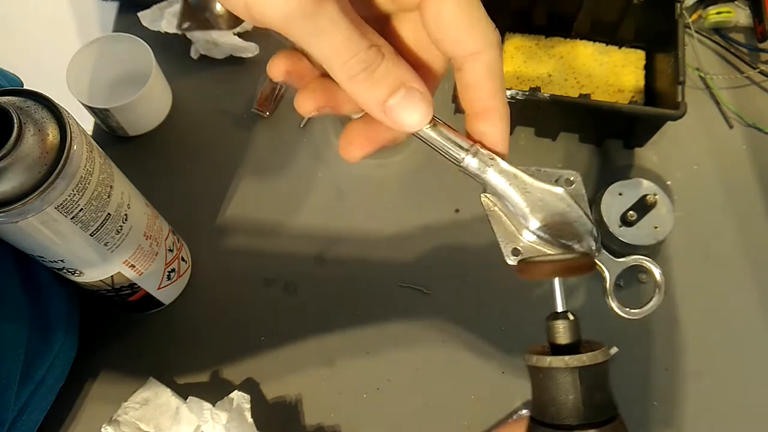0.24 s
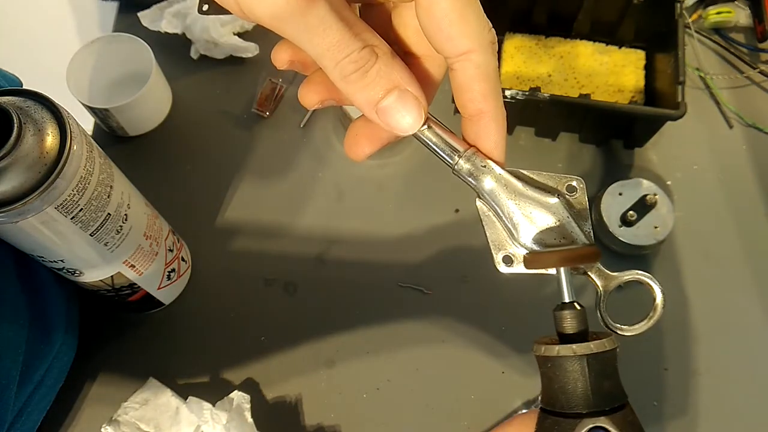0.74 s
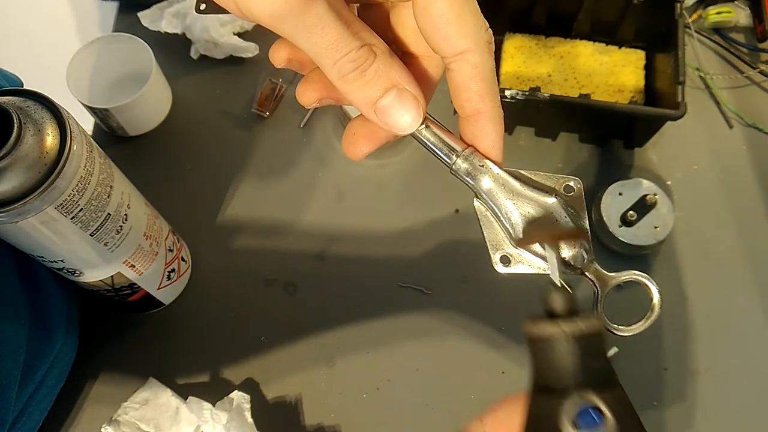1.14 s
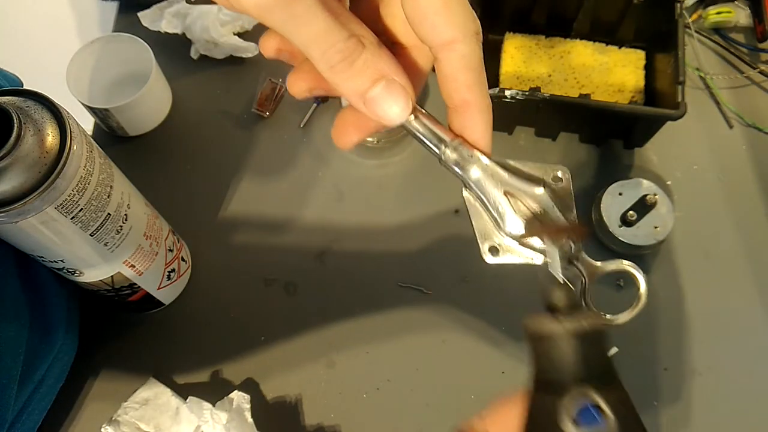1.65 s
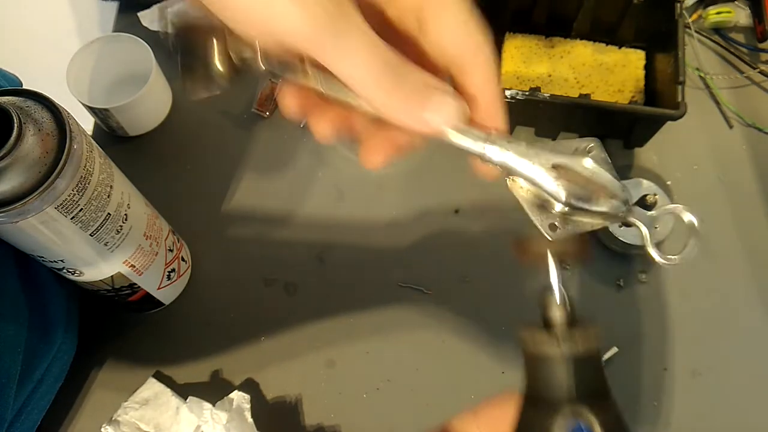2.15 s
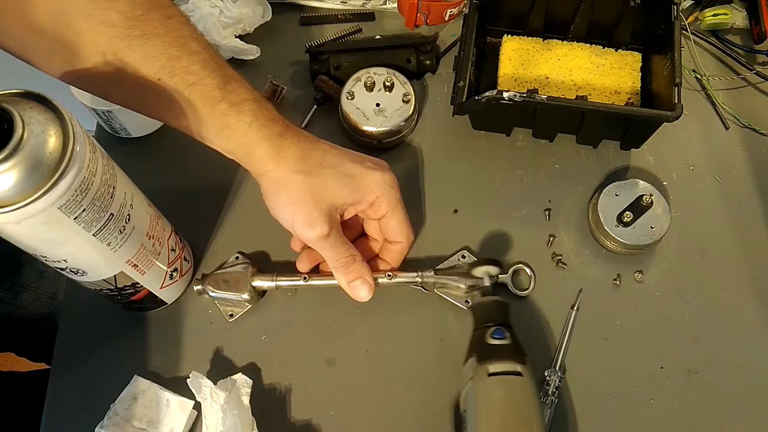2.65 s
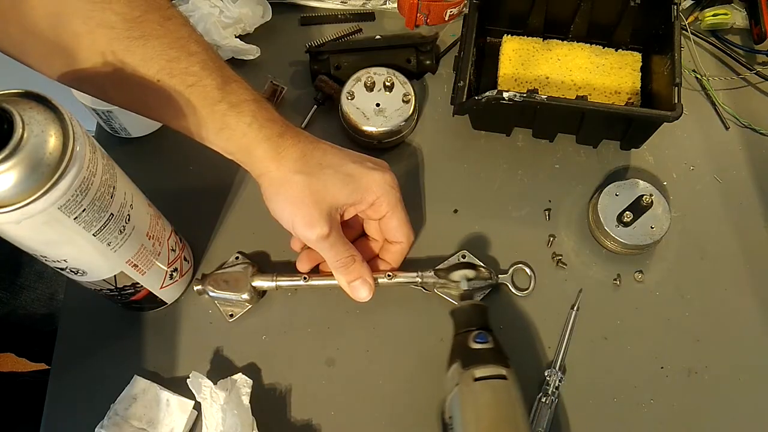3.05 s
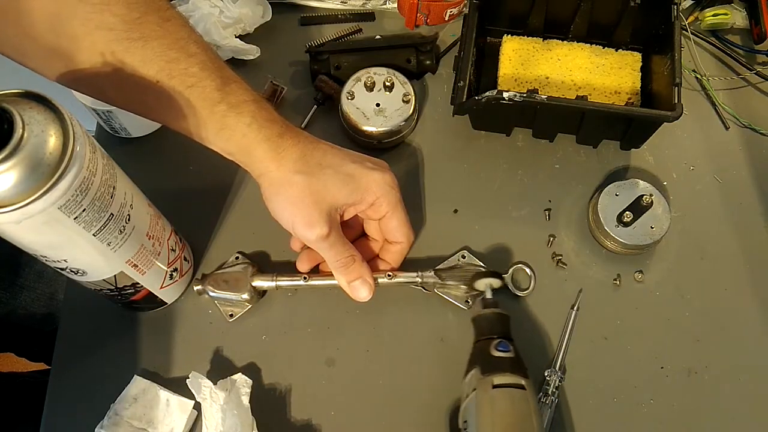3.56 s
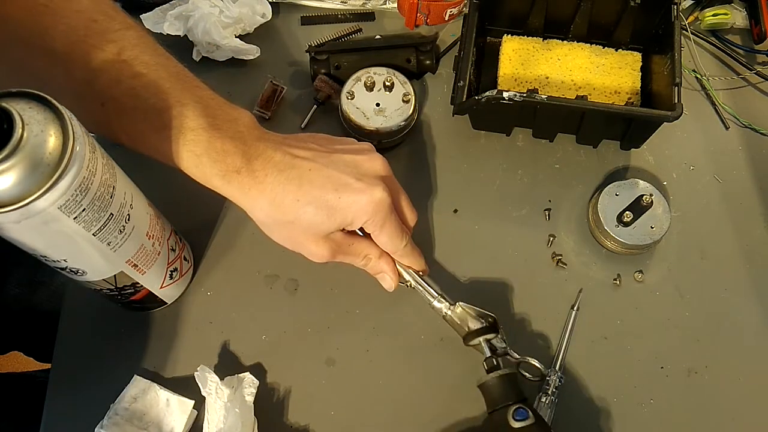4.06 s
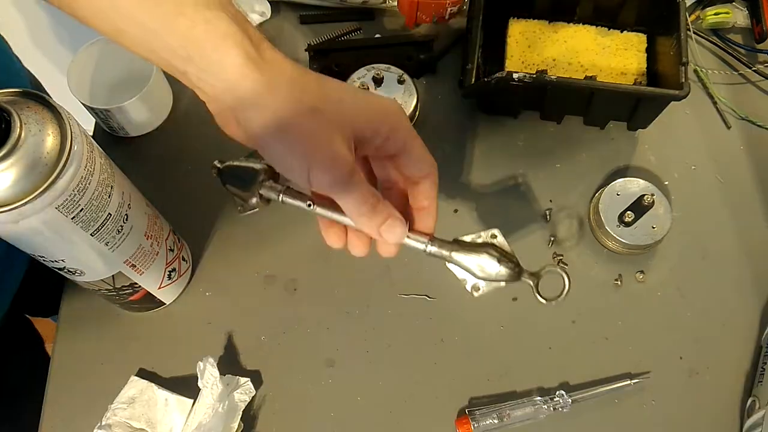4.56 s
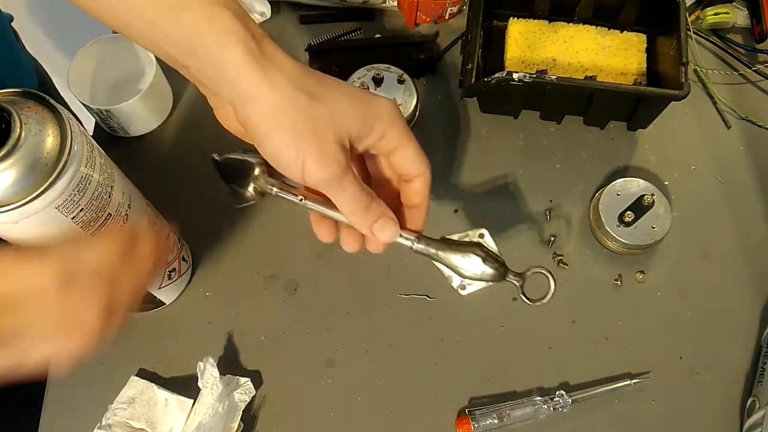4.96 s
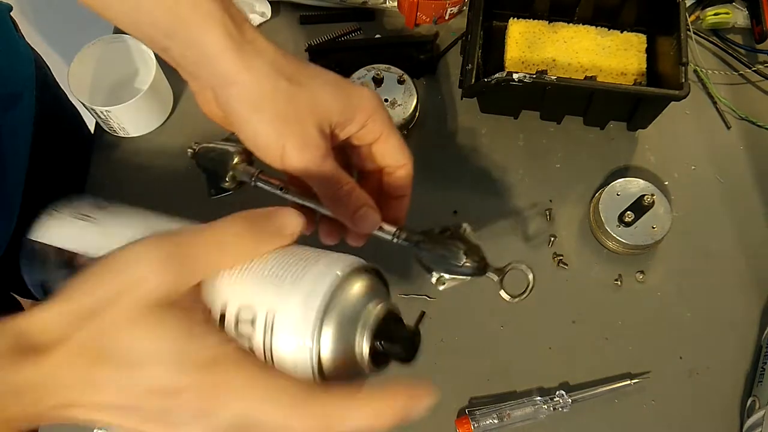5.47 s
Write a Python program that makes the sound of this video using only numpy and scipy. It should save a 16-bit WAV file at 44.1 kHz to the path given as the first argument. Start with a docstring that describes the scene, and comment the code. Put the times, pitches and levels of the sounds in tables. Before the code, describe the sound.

One close microphone in a dry workshop, identical in both channels. First comes loud rotary buffing, dense and buzzy, with airy hiss and brief thin squeals as the motor labours. It switches suddenly to thin, fast-motion whirring, fluttering with quick strokes, leaping higher and clattering once before dropping. Last is a much quieter idle rush with faint whine, a dull bump, light metallic can ticks and a swelling palm slide.

```python
"""First a rotary tool buffs a metal ornament on a workbench: shaft multiples sing, and pulsed fan noise and wheel hiss
surround them; the tool sags as it is pressed harder. Next, at about four times natural speed, its shaft note is a
thin, swooping whine with harmonics shaped by resonances, over rubbing noise and one burst of wheel chatter.
Last the tool idles as a faint whine and rush while a spray can is picked up with decaying noise bursts. A faint room
tone lies under all; a deep notch colours the sound of the one close microphone, and nothing sounds above about 16 kHz."""
import sys
import numpy as np
from scipy.fft import rfft, irfft
from scipy.io import wavfile
from scipy.ndimage import uniform_filter1d

SR = 44100
rng = np.random.default_rng(int(sys.argv[2]) if len(sys.argv) > 2 else 0)


def generate_wav(signal):
    """Clip the signal to [-1, 1] and save it as 16-bit WAV at the path in sys.argv[1]."""
    frames = np.transpose(np.atleast_2d(signal))
    scaled = np.clip(frames, -1, 1) * 32767
    pcm = np.round(scaled).astype(np.int16)
    wavfile.write(sys.argv[1], SR, pcm)


N = 251370
TIME = np.arange(N) / SR  # seconds
FREQS = np.maximum(np.arange(N // 2 + 1) * SR / N, 1)  # Hz, kept above zero for the logarithm
LAPSE_START_S, LAPSE_END_S = 2.248, 4.632  # the fast passage

# Course of the shaft while buffing. Each row: time in seconds, speed in turns per second before slight drift.
SHAFT_SPEED = [(0, 528.2), (.3, 531.5), (.6, 534), (1.12, 536.2), (1.22, 533), (1.32, 526), (1.42, 515),
               (1.62, 489.3), (1.72, 477.6), (1.92, 467), (2.02, 460.9), (2.12, 449.3), (2.25, 463)]
FREE_SPEED_HZ, FULL_SAG_HZ = 528, 55
CAGE_RATIO, RIPPLE_HZ, THROB_HZ = .3919, 100, 16.9  # bearing cage per shaft turn; mains ripple; throb running light
# Motor partials, each a sum of multiples. Each row: multiple of shaft speed, of bearing cage speed, of mains ripple,
# level in dB running light and in dB labouring, both before the trims.
MOTOR_PARTIALS = [(1, 0, 0, -72, -63), (3, 0, 0, -51, -55), (5, 0, 0, -66, -53), (6, 0, 0, -46, -62),
                  (6, 0, -1, -51, -66), (7, 0, 0, -53, -47), (7, 0, 1, -56, -62), (8, 0, 0, -68, -55),
                  (9, 0, 0, -64, -58), (0, 1, 0, -74, -68), (0, 8, 0, -54, -64), (0, 15, 0, -53, -64),
                  (0, 16, 0, -51, -52), (0, 16, 1, -56, -55), (0, 16, -1, -66, -52), (0, 16, -2, -66, -49),
                  (0, 16, -3, -66, -48), (0, 16, -4, -66, -52), (0, 17, 0, -56, -55),
                  (0, 18, 0, -43.5, -60), (0, 20, 0, -70, -57), (0, 24, 0, -60, -60), (0, 32, 0, -62, -72),
                  (0, 36, 0, -53, -66), (0, 54, 0, -67, -72)]
LIGHT_TRIM_DB, HEAVY_TRIM_DB = 0.0, 0.6

# Noise colour of the fan air. Each row: frequency in Hz, relative density in dB per Hz.
FAN_AIR_COLOUR = [(30, -18.5), (120, -11), (300, -8), (520, -8), (720, -12), (950, -0.5), (1400, 0),
                  (2050, 2), (2800, 1), (3700, -1.5), (4300, -7), (5500, -7), (7000, -9.5), (12000, -98)]
# Resonances of the housing. Each row: centre in Hz, width in Hz, lift in dB.
HOUSING_RESONANCES = [(930, 40, 4), (1090, 60, 3), (1260, 90, 2), (1660, 90, 2), (1880, 40, 2),
                      (2020, 90, 2), (2560, 110, 2), (3180, 70, 4)]
FAN_DB, FAN_LOAD_DB = -40.2, -2.5  # fan air running light, and its change under full load
# Noise colour of the buffing wheel. Each row: frequency in Hz, relative density in dB per Hz.
WHEEL_COLOUR = [(3000, -35), (5000, -13.5), (6500, 1), (7400, 7), (7900, 0), (9500, 3.5), (10700, -1),
                (12500, -7), (13600, -13.5), (14250, -11), (14500, -54)]
# How hard the wheel rubs. Each row: time in seconds, hiss level in dB.
WHEEL_RUBBING = [(0, -41), (.2, -41), (.6, -47), (1.43, -47), (1.53, -43.5), (1.64, -51.5), (2.23, -55.5)]
# Squeal of the metal under the wheel. Each row: time in seconds, level in dB.
SQUEAL_COURSE = [(1.3, -89.5), (1.4, -66), (1.5, -43.5), (1.62, -68), (1.76, -48), (1.88, -73)]
SQUEAL_HZ = 10780
# Drone of the bench. Each row: time in seconds, level in dB.
DRONE_COURSE = [(0, -61), (.16, -57), (.48, -69), (.63, -55), (.84, -70), (1.1, -56), (1.65, -77),
                (2.2, -86)]
DRONE_HZ = 54.3

# Pitch of the fast whine before inertia and strokes. Each row: time in seconds, pitch in Hz.
WHINE_PITCH = [(2.277, 1242), (2.309, 1082), (2.385, 1280), (2.447, 896), (2.516, 888), (2.545, 990),
               (2.68, 819), (2.699, 896), (2.784, 928), (2.927, 769), (3.236, 827), (3.309, 770),
               (3.549, 956), (3.669, 1131), (3.728, 1084), (3.785, 1086), (3.854, 1815), (4.062, 2107),
               (4.166, 1545), (4.252, 1478), (4.317, 1084), (4.416, 1126), (4.533, 1364), (4.606, 1135)]
INERTIA_S = .025  # smoothing of the pitch
# Vibration of the shaft. Each row: time in seconds, wobble in dB (lowest two partials), buzz in dB (those above).
SHAFT_VIBRATION = [(2.27, 2, -6), (2.33, 6, 0.5), (2.375, -2, -12), (2.42, 8, 4), (2.46, 2, -16),
                   (2.8, -2, -5), (2.92, -.5, 0), (3.08, -2.5, -3), (3.16, -10.5, -7), (3.29, -16, -14),
                   (3.43, -7.5, -1.5), (3.55, -3, -5), (3.66, -1.5, 3.5), (3.77, 8, 4.5), (3.81, -14, -16),
                   (4.09, 1.5, 0), (4.22, 7.5, 2.5), (4.29, -4.5, 7.5), (4.35, 1, 5.5), (4.41, -7.5, 14),
                   (4.52, -10, 4), (4.62, -3.5, 1)]
# Resonant body of the tool, swept by the three lowest partials. Each row: frequency in Hz, level in dB.
TOOL_RESPONSE = [(700, -57.5), (900, -55), (1020, -53), (1105, -47), (1190, -57.5), (1320, -63),
                 (1530, -65.5), (1850, -69), (2180, -59.5), (2330, -66), (2700, -63.5), (3030, -56),
                 (3180, -61.5), (3370, -55.5), (3600, -65.5), (4000, -64.5), (4300, -66.5), (6000, -61)]
# Colour of the whine's upper partials. Each row: frequency in Hz, relative level in dB.
UPPER_COLOUR = [(2600, -8), (3050, 5), (3350, 14.5), (3750, 1), (4500, 1.5), (5900, -3.5), (6700, 3.5),
                (8000, 0), (10000, 4), (14000, -18)]
SECOND_DB, SECOND_FOLLOWS, THIRD_DB = -1, .6, 0  # partials 2 and 3; share of the wobble that the second follows
UPPER_DB, UPPER_FOLLOWS = -70.5, 0.79  # partials from the fourth; share of the buzz that they follow
# the wheel is worked to and fro: it drags once a cycle and bites at both turning points
STROKES_FROM_S, STROKES_TO_S, STROKES_FADE_S = 2.83, 3.6, .05
STROKE_HZ, DRAG_S, BITE_S = 6.7, 2.982, 2.962  # rate, and a moment of strongest drag and of strongest bite
DRAG_DEPTH, BITE_DEPTH = .045, .04  # fractions of the pitch

# Fast rubbing. Each row: time in seconds, hiss level in dB before flutter.
FAST_RUBBING = [(2.28, -49), (2.5, -52), (3.06, -53), (3.29, -67.5), (3.55, -50), (3.81, -49.5),
                (3.85, -45.5), (4.08, -48.5), (4.3, -52), (4.53, -50.5), (4.62, -52.5)]
# Noise colour of the fast rush. Each row: frequency in Hz, relative density in dB per Hz.
FAST_AIR_COLOUR = [(30, -16), (150, -21), (260, -12.5), (350, -6), (430, 1.5), (660, -1.5), (900, -0.5),
                   (1400, -0.5), (2500, -0.5), (3300, 1), (4400, -1), (6000, -9.5), (9000, -21)]
# Noise colour of the fast hiss. Each row: frequency in Hz, relative density in dB per Hz.
FAST_HISS_COLOUR = [(500, -45), (3000, -14), (5500, -25), (7000, -1), (8500, 2), (9800, 5.5), (12000, 1.5),
                    (15600, 3), (16200, 5.5)]
# Low hum of the fast passage. Each row: frequency in Hz, level in dB at the usual rubbing.
FAST_HUM = [(400, -77.5), (432, -72), (532, -83), (800, -72)]
FAST_AIR_DB, AIR_FOLLOWS, USUAL_RUB_DB = -64.5, 0.59, -51  # rush at usual rubbing; share of its swing; usual level
# Wheel chattering on the metal. Each row: start in seconds, level in dB, 60 dB decay in seconds.
CHATTER_HITS = [(3.846, -54, 0.06), (3.9015, -29.5, 0.011), (3.908, -36, 0.085), (3.921, -41.5, 0.045),
                (3.933, -45, 0.043)]
# Colour of the struck metal. Each row: frequency in Hz, relative level in dB.
METAL_COLOUR = [(150, -52), (500, -31), (1800, -9), (2700, -10), (3200, 17), (3500, 2), (3800, -3),
                (4250, 0), (5000, -13), (9000, -39), (15000, -30)]

# Rush of the idling tool, fading, then swelling as the hand returns. Each row: time in seconds, level in dB.
IDLE_RUSH = [(4.65, -60), (4.85, -70.5), (5.05, -71), (5.36, -72), (5.55, -64.5), (5.69, -57.5)]
# Noise colour of the idle rush. Each row: frequency in Hz, relative density in dB per Hz.
IDLE_AIR_COLOUR = [(30, -1), (130, -2.5), (350, 2), (600, -2.5), (1000, -0.5), (1350, 1), (1550, 3.5),
                   (1750, 4.5), (2300, -5), (3200, 0), (3800, -9.5), (5500, -21), (8000, -35)]
# Noise colour shared by the idle hiss and the sliding palm. Each row: frequency in Hz, relative density in dB per Hz.
IDLE_HISS_COLOUR = [(2500, -27), (4200, -1), (5500, -16), (7500, -1.5), (9500, 2.5), (12000, 3.5),
                    (14250, 6.5), (14500, -50)]
# Idle whine. Each row: frequency in Hz before slow drift, level in dB.
IDLE_WHINE = [(1508, -74), (1712, -75), (3205, -73)]
IDLE_HISS_DB, IDLE_DRONE_DB = -11.5, -78.5  # hiss relative to the rush; drone of the bench
# Ticks of the can in the hand. Each row: start in seconds, level in dB, 60 dB decay in seconds.
CAN_TICK_HITS = [(5.568, -60.5, 0.17), (5.66, -43.5, 0.076), (5.681, -56, .04)]
# Colour of the can. Each row: frequency in Hz, relative level in dB.
CAN_COLOUR = [(500, -22), (1500, -1), (2700, 6), (3500, 2), (4400, 1), (7000, 8), (10000, 3.5),
              (14200, -20), (14600, -48)]
# Dull bump as the can leaves the bench. Each row: start in seconds, level in dB, 60 dB decay in seconds.
CAN_LIFT_BUMP = [(5.197, -67, 0.7)]
# Colour of the bench. Each row: frequency in Hz, relative level in dB.
BENCH_COLOUR = [(40, -25), (100, -22), (138, 19), (190, -22), (400, -3), (2000, -55)]
GRIP_S, GRIP_RISE_DB_PER_S, GRIP_DB = 5.78, 100, -62  # the slide rises towards a peak just past the end

# Still air of the workshop. Each row: frequency in Hz, relative density in dB per Hz.
ROOM_COLOUR = [(30, 7.5), (100, 2), (300, -13), (1000, -18), (4000, -38)]
ROOM_DB = -99
# Microphone response with a deep notch. Each row: frequency in Hz, level in dB.
MICROPHONE_RESPONSE = [(4000, 1.5), (4700, -3.5), (5230, -10.5), (5450, -47), (5620, -16), (5800, -9),
                       (6400, 0.5)]
CUTOFF_HZ = 15900  # upper limit of the band


def buffing():
    """Superposition: motor partials, turbulent fan air, frictional hiss and squeal, and the bench's drone add up."""
    speed, = in_time(SHAFT_SPEED)
    hiss_db, = in_time(WHEEL_RUBBING)
    squeal_db, = in_time(SQUEAL_COURSE)
    drone_db, = in_time(DRONE_COURSE)
    speed = speed * (1 + .0003 * drift(15.0))
    load = np.clip((FREE_SPEED_HZ - speed) / FULL_SAG_HZ, 0, 1)
    air = from_db(FAN_DB + FAN_LOAD_DB * load) * fan_air(load)
    hiss = from_db(hiss_db) * wheel_hiss(speed)
    squeal = from_db(squeal_db) * tone(angle(SQUEAL_HZ), waver=1.5, rate=39.0)
    return motor_tones(speed, load) + air + hiss + squeal + rumble(drone_db)


def motor_tones(speed, load):
    """Rotational harmonics: fan, commutator and ball bearing sing at shaft multiples, with mains ripple sidebands."""
    shaft, ripple = angle(speed), angle(RIPPLE_HZ)
    throb = 1 + .25 * np.sin(angle(THROB_HZ))
    heavy = load ** 2
    out = 0
    for turns, cage, sideband, light_db, heavy_db in MOTOR_PARTIALS:
        phase = (turns + cage * CAGE_RATIO) * shaft + sideband * ripple
        light_gain = (1 - heavy) * from_db(light_db + LIGHT_TRIM_DB) * throb
        heavy_gain = heavy * from_db(heavy_db + HEAVY_TRIM_DB)
        out = out + (light_gain + heavy_gain) * tone(phase, waver=.2, rate=12.0)
    return out


def fan_air(load):
    """Amplitude modulation: turbulence pulses with the motor's drive and sounds through the housing's resonances."""
    # the speed control fires once each half cycle of the mains, harder as the motor labours
    firing = np.exp(-(TIME * RIPPLE_HZ % 1) / 0.32)
    pulsing = 1 + (.25 + .45 * load) * (firing - firing.mean())
    return noise(FAN_AIR_COLOUR, HOUSING_RESONANCES, pulsing)


def wheel_hiss(speed):
    """Friction noise: the wheel rubs hardest once in each turn, with some chance unevenness."""
    return noise(WHEEL_COLOUR, pulsing=1 + 0.073 * np.sin(angle(speed)) + 0.088 * drift(37.0))


def sped_up():
    """Superposition: whistle, low hum, the wheel's rubbing and its chatter on the metal add up."""
    rub_db, = in_time(FAST_RUBBING)
    swell_db = AIR_FOLLOWS * (rub_db - USUAL_RUB_DB)
    hum = sum(from_db(db + .5 * swell_db) * tone(angle(hz), waver=0.62, rate=17.0) for hz, db in FAST_HUM)
    # the grip of the wheel is uneven, so the rubbing flutters
    air = from_db(FAST_AIR_DB + swell_db + 1.6 * drift(16.0)) * noise(FAST_AIR_COLOUR)
    hiss = from_db(rub_db + 1.6 * drift(14.0)) * noise(FAST_HISS_COLOUR)
    return whistle() + hum + air + hiss + bursts(CHATTER_HITS, METAL_COLOUR)


def whistle():
    """Source and resonator: the quickened shaft note's partials swell as they sweep through the body's resonances."""
    pitch = uniform_filter1d(in_time(WHINE_PITCH)[0], int(INERTIA_S * SR)) * strokes()
    wobble_db, buzz_db = in_time(SHAFT_VIBRATION)
    shaft = angle(pitch * (1 + 0.0018 * drift(70.0)))
    first = from_db(wobble_db + at_hz(TOOL_RESPONSE, pitch)) * tone(shaft, waver=0.2, rate=67.0)
    second_db = SECOND_DB + SECOND_FOLLOWS * wobble_db + at_hz(TOOL_RESPONSE, 2 * pitch)
    second = from_db(second_db) * tone(2 * shaft, waver=0.37, rate=17.0)
    third_db = THIRD_DB + buzz_db + at_hz(TOOL_RESPONSE, 3 * pitch)
    third = from_db(third_db) * tone(3 * shaft, waver=0.37, rate=17.0)
    upper = colour(sum(tone(k * shaft, waver=.9, rate=35) for k in range(4, 15)), UPPER_COLOUR)
    return first + second + third + from_db(UPPER_DB + UPPER_FOLLOWS * buzz_db) * upper


def strokes():
    """Periodic loading: drag at the stroke rate and bite at twice that rate swing the shaft speed by this factor."""
    inside_s = np.minimum(TIME - STROKES_FROM_S, STROKES_TO_S - TIME)
    working = np.clip(inside_s / STROKES_FADE_S, 0, 1)
    drag = DRAG_DEPTH * np.cos(2 * np.pi * STROKE_HZ * (TIME - DRAG_S))
    bite = BITE_DEPTH * np.cos(2 * np.pi * 2 * STROKE_HZ * (TIME - BITE_S))
    return 1 - working * (drag + bite)


def idling():
    """Superposition: drifting whine, turbulent rush and bench drone add to the contact noises of the lifted can."""
    rush_db, = in_time(IDLE_RUSH)
    whine = 0
    for hz, db in IDLE_WHINE:
        phase = angle(hz * (1 + 0.00199 * drift(3.28)))
        whine = whine + from_db(db) * tone(phase, waver=0.6, rate=15.0)
    # the palm slides on the can, ever louder
    grip = from_db(GRIP_DB - GRIP_RISE_DB_PER_S * np.abs(TIME - GRIP_S))
    rush = from_db(rush_db) * noise(IDLE_AIR_COLOUR)
    hiss = (from_db(rush_db + IDLE_HISS_DB) + grip) * noise(IDLE_HISS_COLOUR)
    can = bursts(CAN_TICK_HITS, CAN_COLOUR) + bursts(CAN_LIFT_BUMP, BENCH_COLOUR)
    return whine + rush + hiss + rumble(IDLE_DRONE_DB) + can


def bursts(events, body):
    """Damped excitation: each rough contact starts at once and dies away in the colour of the struck body."""
    envelope = 0
    for s, db, t60 in events:
        decay_db = 60 * np.maximum(TIME - s, 0) / t60
        envelope = envelope + after(s) * from_db(db - decay_db)
    return envelope * noise(body)


def rumble(level_db):
    """Resonance: the bench drones at one low frequency with wavering strength."""
    return from_db(level_db) * tone(angle(DRONE_HZ), waver=0.26, rate=6.0)


def room_tone():
    """Background noise: the still air of the workshop is steady, mostly low noise."""
    return from_db(ROOM_DB) * noise(ROOM_COLOUR)


def noise(spectrum, resonances=(), pulsing=1):
    """Filtered turbulence: white noise, optionally pulsed, sounds through a spectrum; rms 1."""
    return rms_one(colour(rng.standard_normal(N) * pulsing, spectrum, resonances))


def tone(phase, waver, rate):
    """Narrow-band partial: chance in both quadratures makes strength and phase waver."""
    in_phase = np.sin(phase) * (1 + waver * drift(rate))
    quadrature = np.cos(phase) * waver * drift(rate)
    return (in_phase + quadrature) / np.sqrt(1 + 2 * waver ** 2)


def drift(rate):
    """Low-passed chance: noise weakened above the rate in Hz; rms 1."""
    return rms_one(irfft(rfft(rng.standard_normal(N)) / (1 + (FREQS / rate) ** 2), N))


def colour(x, spectrum, resonances=()):
    """Linear filtering: a smooth spectrum with resonant bumps on top."""
    curve = at_hz(spectrum, FREQS)
    for centre, width, lift in resonances:
        curve = curve + lift / (1 + (2 * (FREQS - centre) / width) ** 2)
    return irfft(rfft(x) * from_db(curve), N)


def at_hz(spectrum, hz):
    """Spectral interpolation: level in dB at the given frequencies, linear over log frequency."""
    points, db = np.transpose(spectrum)
    return np.interp(np.log(hz), np.log(points), db)


def in_time(rows):
    """Linear interpolation: each column of a curve table at every sample."""
    s, *columns = np.transpose(rows)
    return [np.interp(TIME, s, c) for c in columns]


def angle(hz):
    """Phase as the integral of frequency, in radians."""
    return 2 * np.pi * np.cumsum(hz * np.ones(N)) / SR


def after(s):
    """Switching: a rise from 0 to 1 within a millisecond around the given second."""
    return np.clip((TIME - s) / .001 + .5, 0, 1)


def from_db(db):
    """Logarithmic level: decibels to amplitude gain."""
    return 10 ** (np.asarray(db) / 20)


def rms_one(x):
    """Normalisation: scale to unit rms."""
    return x / np.sqrt(np.mean(x ** 2) + 1e-20)


def scene():
    """Succession: three passages follow abruptly over a faint room tone, alike in both channels."""
    fast, done = after(LAPSE_START_S), after(LAPSE_END_S)
    passages = (1 - fast) * buffing() + (fast - done) * sped_up() + done * idling()
    mono = passages + room_tone()
    return np.array([mono, mono])


def record(dry):
    """Linear filtering: the microphone's notch, then an upper limit of the band near 16 kHz."""
    band_limit = 1 / np.sqrt(1 + (FREQS / CUTOFF_HZ) ** 300)
    return irfft(rfft(colour(dry, MICROPHONE_RESPONSE)) * band_limit, N)


dry = scene()
out = record(dry)
generate_wav(out)
```